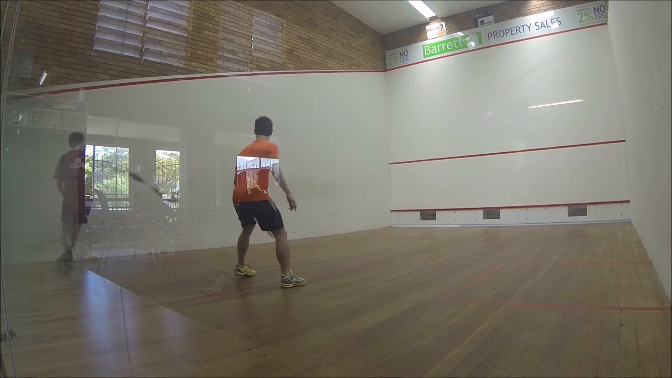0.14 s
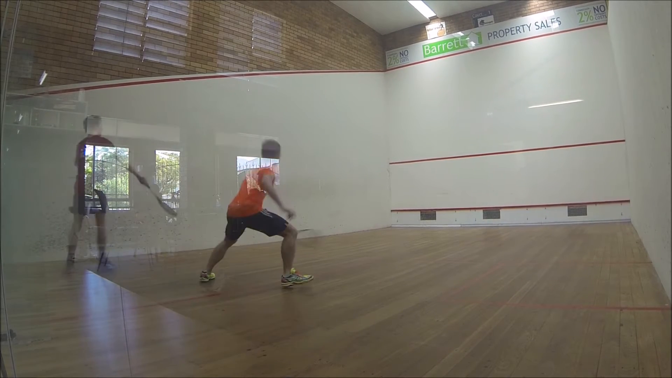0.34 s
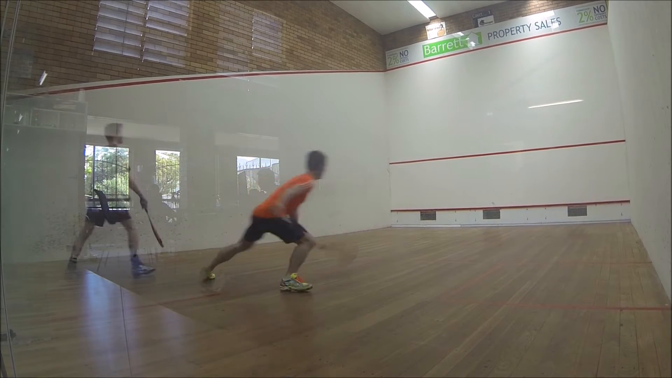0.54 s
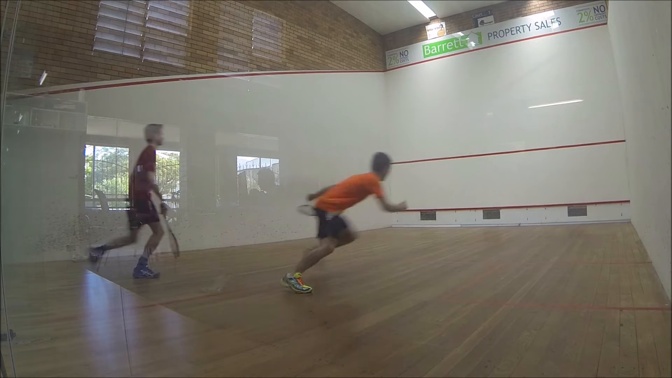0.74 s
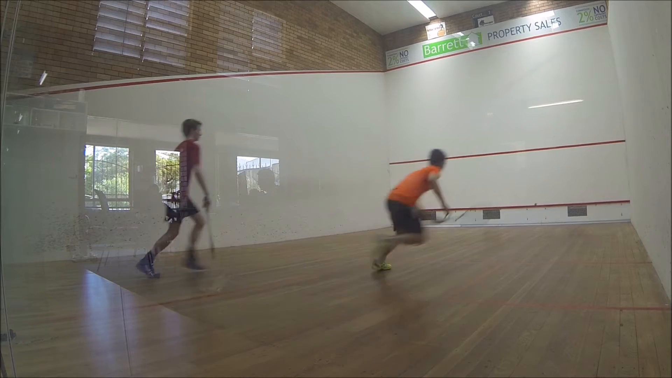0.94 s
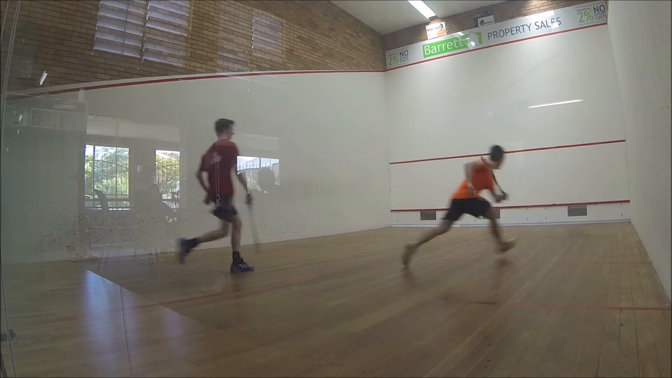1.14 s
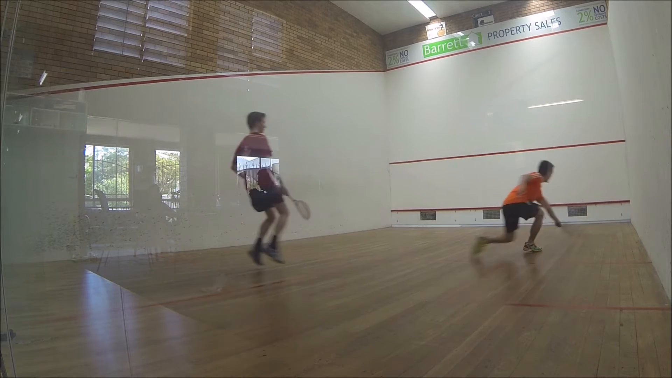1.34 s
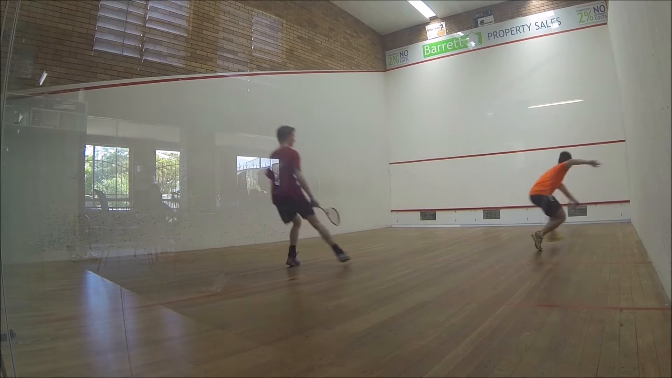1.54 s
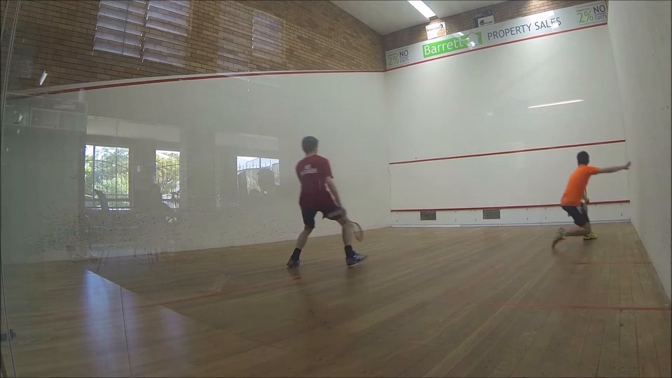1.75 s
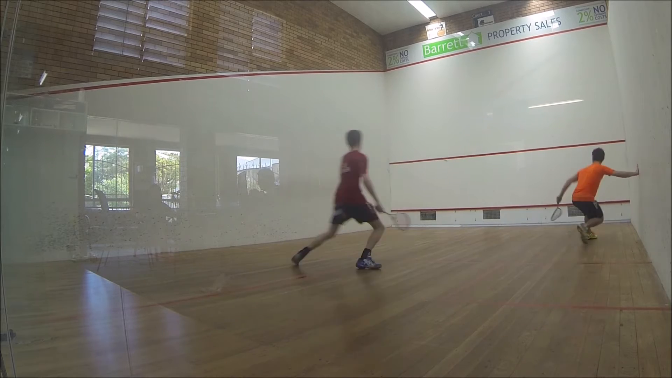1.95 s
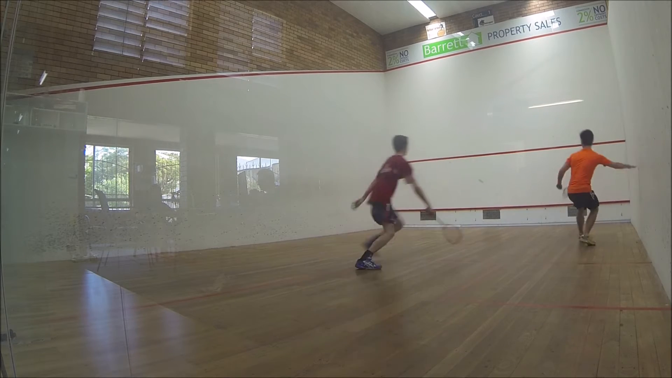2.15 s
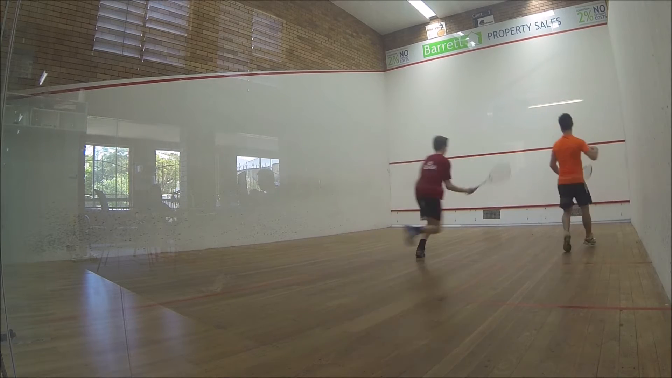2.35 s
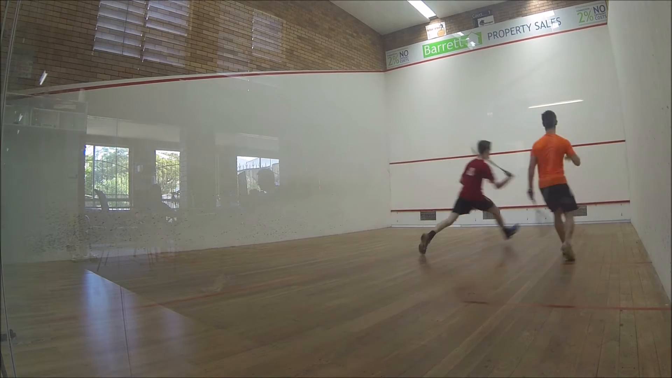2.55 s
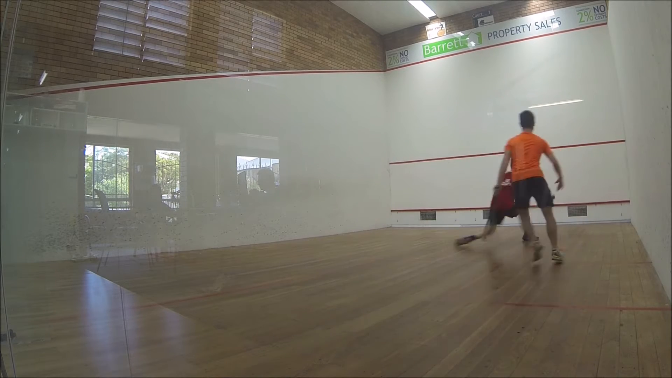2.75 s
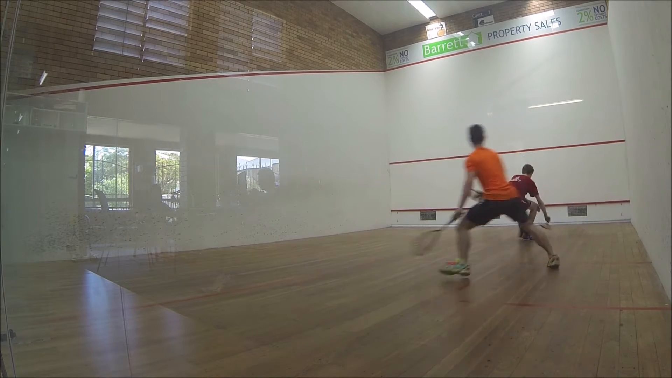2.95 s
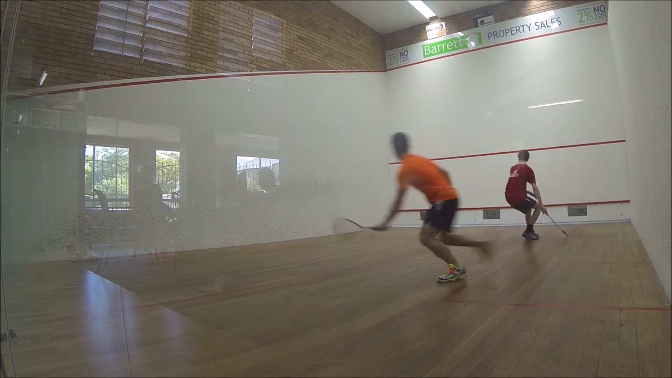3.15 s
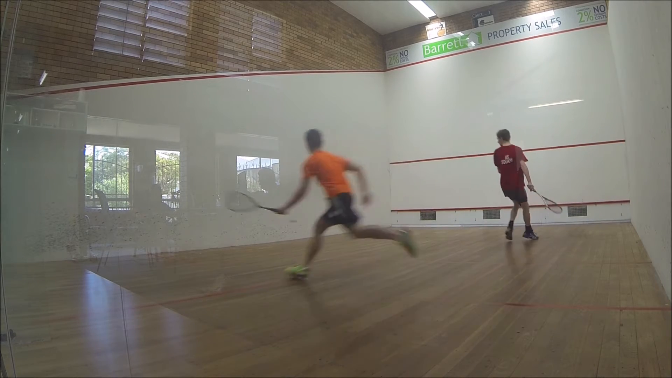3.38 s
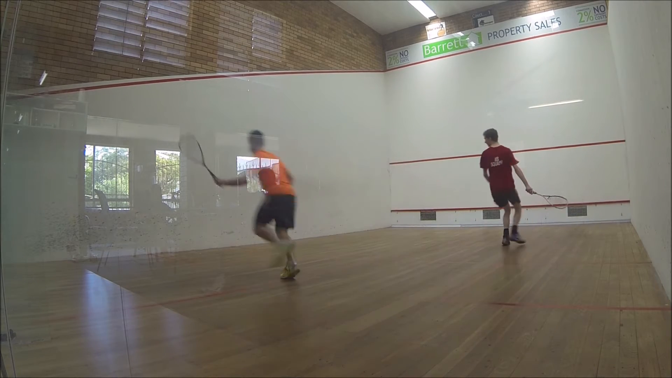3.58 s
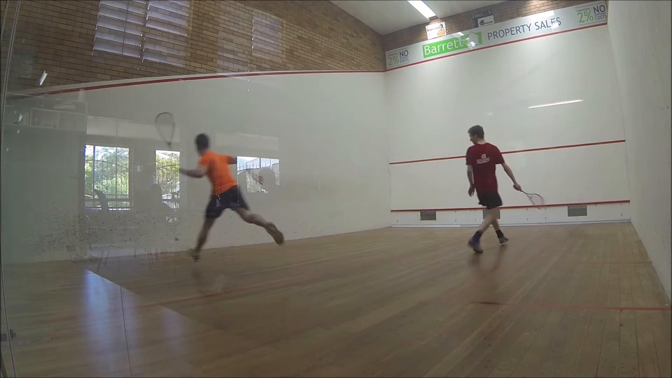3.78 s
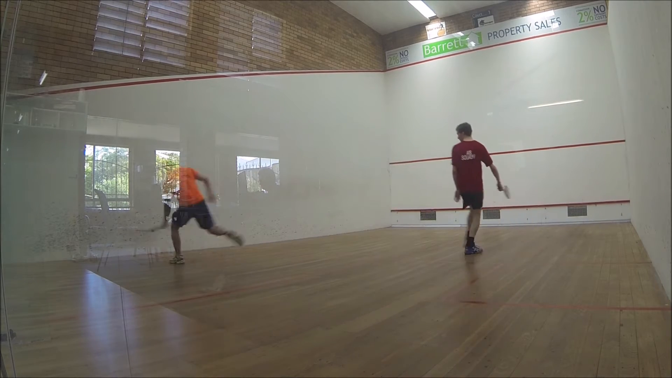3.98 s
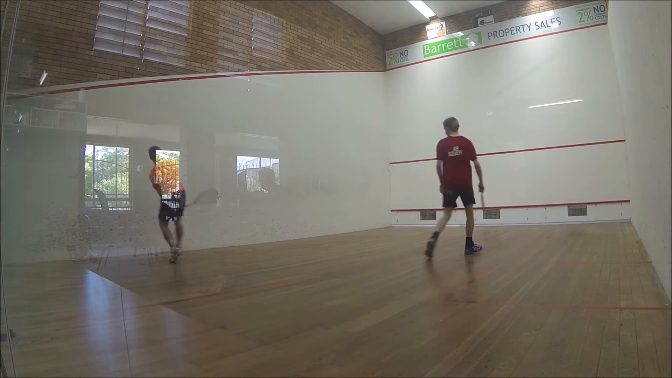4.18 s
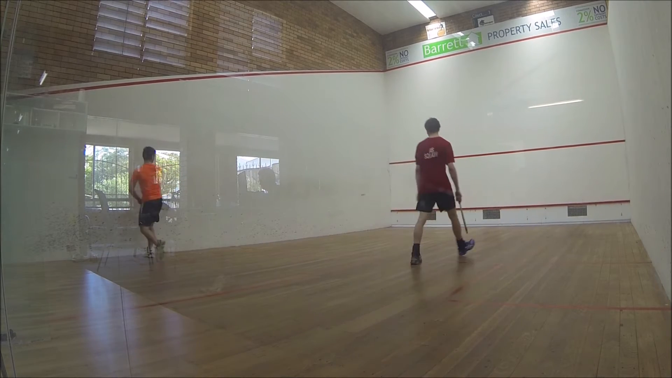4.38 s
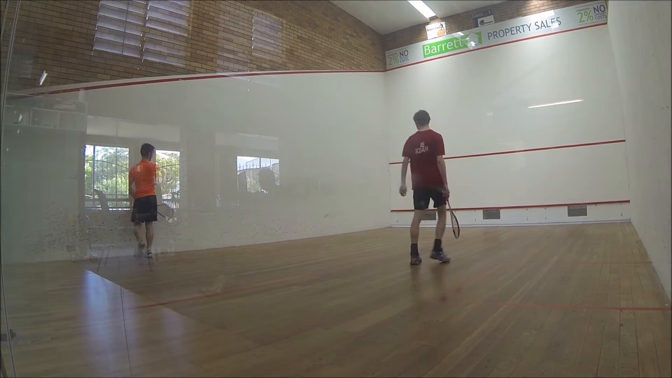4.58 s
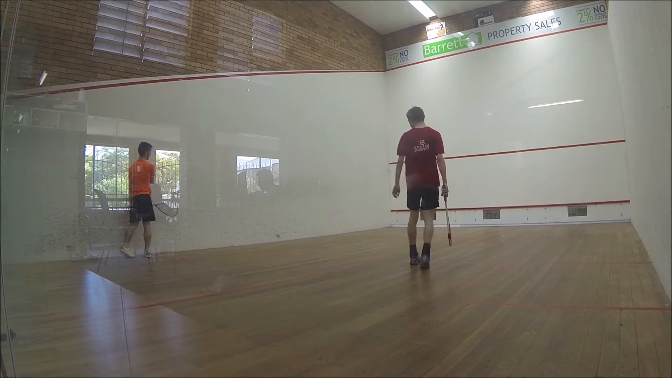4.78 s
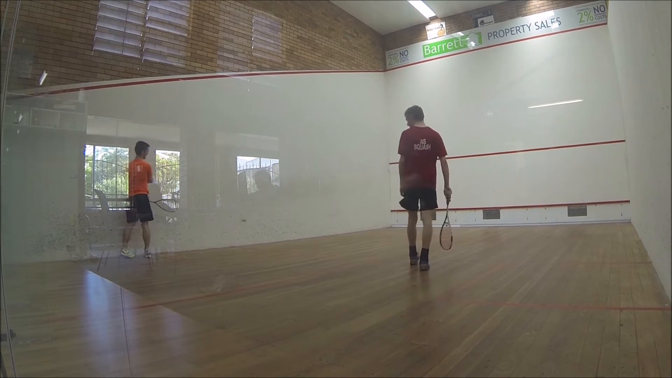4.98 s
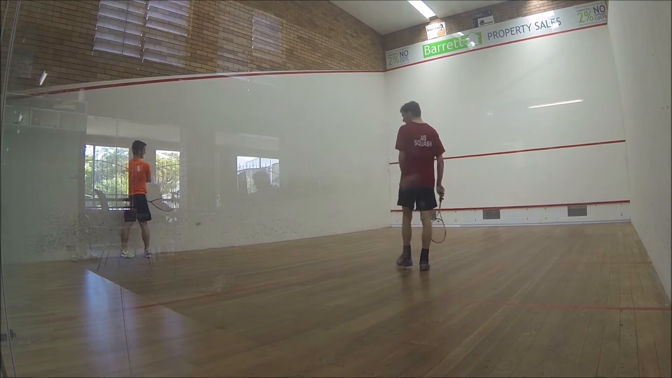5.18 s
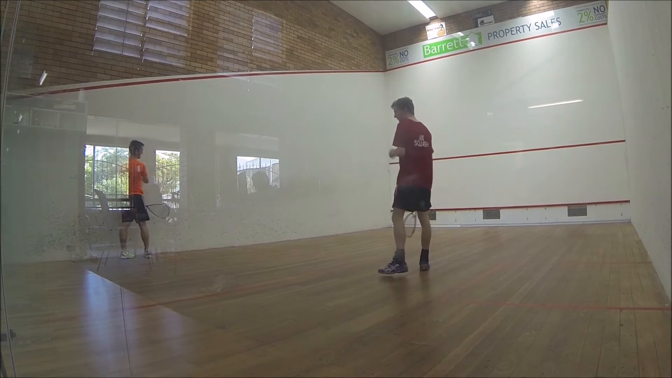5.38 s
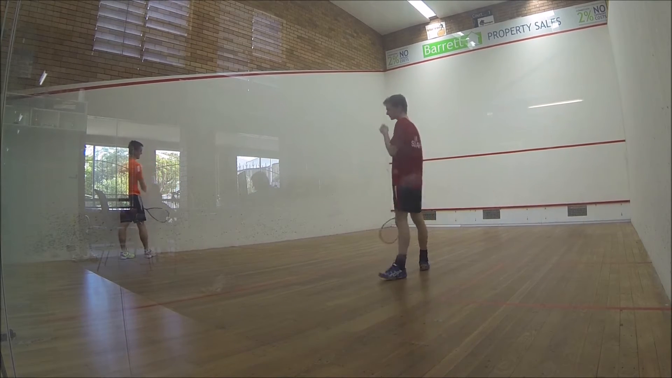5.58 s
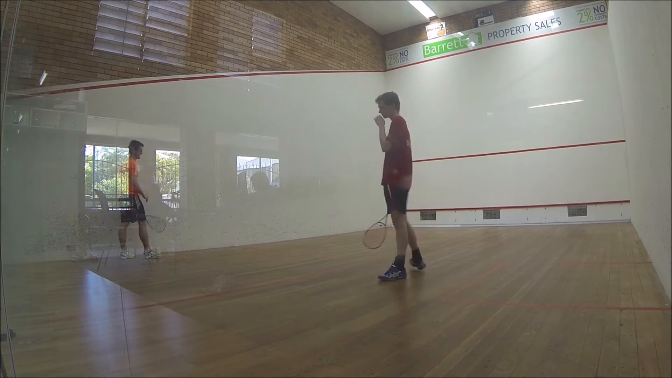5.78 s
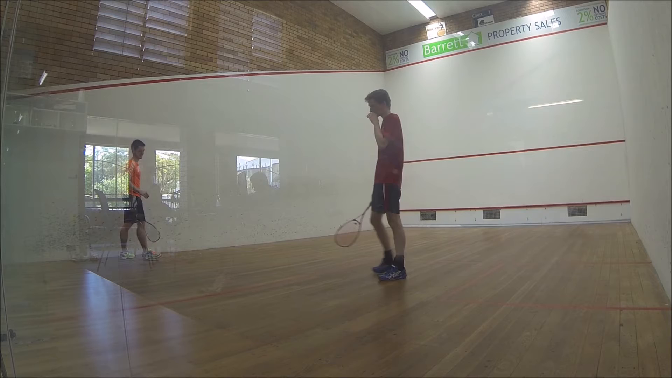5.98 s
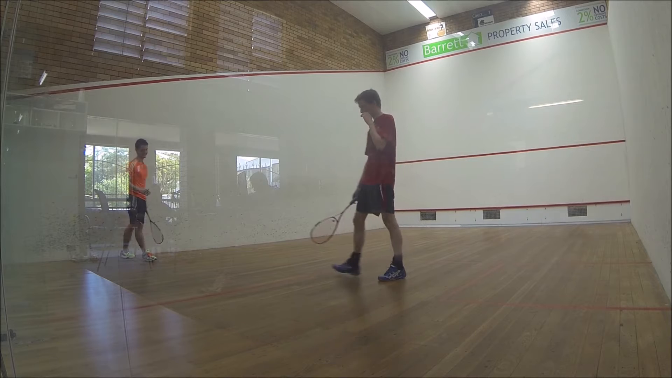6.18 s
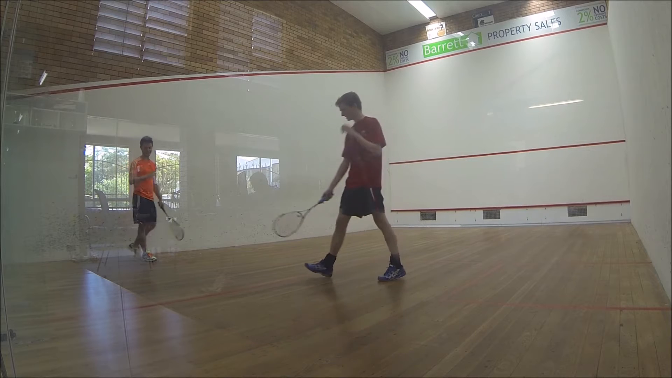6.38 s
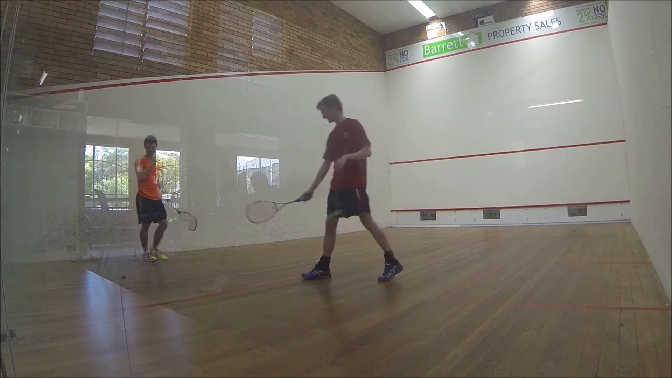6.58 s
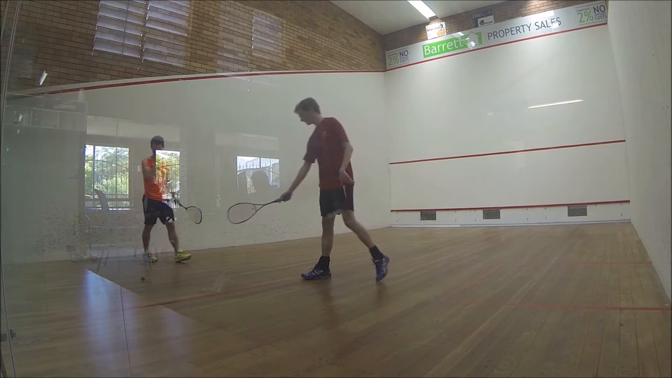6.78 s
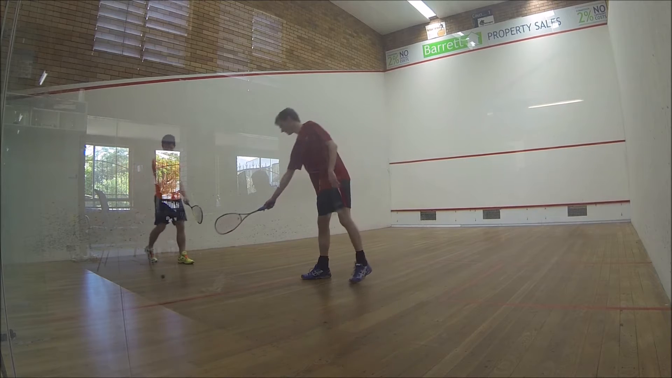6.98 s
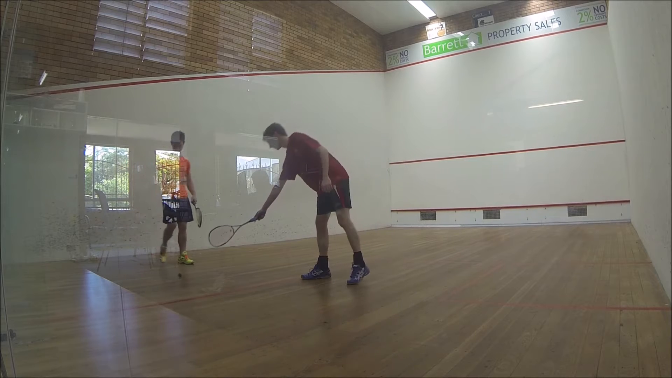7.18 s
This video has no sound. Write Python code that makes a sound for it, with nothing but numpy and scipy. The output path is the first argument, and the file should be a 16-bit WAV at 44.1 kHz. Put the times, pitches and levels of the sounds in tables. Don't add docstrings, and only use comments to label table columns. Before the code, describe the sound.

Two squash players run and strike a hollow ball in a reverberant court, shoes squeaking and floor thumping, until play stops and echoes fade.

```python
import sys
import numpy as np
from scipy import signal
from scipy.fft import rfft, irfft
from scipy.io import wavfile
from scipy.ndimage import uniform_filter1d

SR = 44100
rng = np.random.default_rng(int(sys.argv[2]) if len(sys.argv) > 2 else 0)


def boost(x):
    u = np.asarray(x, float) / 20
    return 10 ** u


def digitize_waveform(pressure):
    field = np.atleast_2d(pressure).T
    bounded = np.clip(field, -1, 1)
    quanta = np.round(bounded * 32767).astype(np.int16)
    wavfile.write(sys.argv[1], SR, quanta)


N = 318831
LEAD = 4410
PLACES = 3

# start_s [s], level_db [dB], body_hz
# [Hz], hardness_db [dB]
SMACKS = [
    (.148, -9, 874, -6),
    (.222, -16.5, 420, 2.5),
    (1.631, -22, 1500, 15.5),
    (2.993, -2.5, 746, -3),
    (4.392, -12.5, 1270, 6.5),
    (5.913, -40, 810, 2),
]
# start_s [s], level_db [dB], body_hz [Hz], hardness_db [dB]
STROKES = [
    (.737, -3.5, 815, 6.5),
    (4.067, -17, 1080, 9),
]
# start_s [s], level_db [dB], body_hz [Hz], hardness_db [dB]
FAR_BLOWS = [
    (.700, -6, 948, 5),
    (1.915, -12.5, 1720, -1.5),
    (3.022, -6.5, 750, 1),
    (3.190, -10.5, 790, 5),
    (4.040, -7, 990, -13),
    (4.461, -14.5, 666, 0),
]
# start_s [s], level_db
# [dB], body_hz [Hz], hardness_db [dB]
SLAPS = [
    (.133, -10.5, 430, -10),
    (1.170, -27, 500, -4),
    (1.317, -12.5, 860, -4.5),
    (1.532, -12, 810, -1.5),
    (1.798, -6, 935, 0.5),
    (4.160, -12.5, 750, 2),
    (2.842, -14.5, 500, -11),
    (4.188, -10.5, 486, -14),
    (4.370, -1, 663, -6.5),
]
# start_s [s], level_db [dB], body_hz [Hz], hardness_db [dB]
SCUFFS = [
    (-.03, -28, 830, 20.5),
    (.636, -13, 800, 4.5),
    (1.556, -23, 850, 5),
    (2.730, -28, 817, 10.5),
    (2.860, -7, 775, 3.5),
    (2.885, -10.5, 1790, 5.5),
    (3.350, -13, 805, -3.5),
    (6.945, -39, 800, -2),
]
# start_s [s], level_db [dB], body_hz [Hz], hardness_db [dB]
TAPS = [
    (5.563, -37.5, 1160, 4.5),
    (5.934, -34.5, 890, 3.5),
    (6.650, -32.5, 635, -4),
    (6.820, -36.5, 593, -1),
]
# events, crack_db above hardness [dB], direct_db of first arrival [dB], body_db of note [dB]
CONTACTS = [(SMACKS, 5.5, 7.6, 5.6), (STROKES, -8.5, 6.9, 7), (FAR_BLOWS, -19, -2, 6.5),
            (SLAPS, 2.2, 4, 5.7), (SCUFFS, 3.5, -3.5, 4.3), (TAPS, -2, 10.1, 11.3)]
# start_s [s], level_db [dB], pitch_hz [Hz], length_s [s], glide_hz [Hz]
SQUEAKS = [(-.095, -20.5, 3070, 0.063, 16), (-.08, -11.5, 3640, 0.078, 83), (.040, -23, 2070, 0.106, 84),
           (.430, -29.5, 2240, 0.033, 19), (.580, -21.5, 2890, 0.0345, -200),
           (.590, -27.5, 2212, 0.066, 57), (.596, -29, 5100, .05, 150), (1.630, -16, 2728, 0.0308, 214),
           (1.630, -12, 5420, 0.018, 250), (1.637, -22, 4050, 0.011, 51), (1.632, -31, 2300, 0.012, 90),
           (2.856, -17.5, 3194, 0.11, 25), (2.905, -26, 3160, 0.078, -28)]
# start_s [s], peak_db [dB], sway_hz [Hz], t60_s [s]
LANDINGS = [(1.022, -16.5, 38.7, 0.84), (1.107, -16, 61, 0.42), (1.412, -10, 54.6, 0.43),
            (1.879, -24, 28.8, 0.53), (1.93, -6.5, 34.9, 0.38), (2.83, -3, 25.8, 0.16),
            (2.875, -4, 29.9, 0.39), (3.178, -27, 35.4, 0.35), (3.634, -13, 41.7, 0.64),
            (3.783, -9.5, 37.3, 0.34), (4.046, -13, 43.5, 0.57), (4.252, -12.5, 31, 0.44),
            (4.475, -12, 41.3, 0.24), (4.656, -13, 40.4, 0.18), (5.246, -11, 29.2, 0.13),
            (5.729, -12.5, 35.3, 0.32), (5.86, -26, 36, 0.58), (6.303, -20, 33.1, 0.46),
            (6.439, -20, 26.8, 0.26)]
# full_weight_s [s], shudder_db [dB], knock_db [dB]
TREADS = [(.08, -29.5, -44), (.2, -30, -22.5), (0.361, -29, -45), (.56, -25.5, -25), (0.801, -27, -22),
          (1.04, -15.5, -19.5), (1.2, -16.5, -18), (1.469, -9, -18), (1.65, -20, -21), (1.95, -7.5, -16),
          (2.19, -18, -21.5), (2.58, -24, -30), (2.919, -9, -16.5), (3.08, -33, -42), (3.26, -16.5, -15),
          (3.62, -21, -20), (3.72, -37, -23.5), (3.9, -29, -38), (4.081, -11.5, -18.5), (4.17, -13, -12.5),
          (4.36, -31, -15), (4.49, -13, -21.5), (4.7, -19.5, -28), (5.27, -42, -37), (5.7, -32, -35),
          (5.94, -21.5, -29.5), (6.34, -24.5, -38), (6.61, -30.5, -35.5), (6.95, -34, -44)]
# centre_hz [Hz], width_hz [Hz], level_db [dB]
FLOOR_MODES = [(31.6, 15, 6.5), (40.8, 18, -1), (65.2, 20, -6), (84, 110, -33)]
# freq_hz [Hz], t60_s [s]
COURT_RING = [(100, 0.61), (300, 2.83), (800, 2.12), (2000, 2.41), (4000, 2.13), (8000, 1.4), (14000, 1.4)]
# freq_hz [Hz], density_db [dB per Hz]
PLAY_TONE = [(60, -24), (120, -31), (250, -2), (500, -0.5), (1200, -6.5), (2400, -13), (4500, -26),
             (7000, -44.5), (10000, -46), (13000, -55.5), (15500, -58)]
# freq_hz [Hz], density_db [dB per Hz]
HUM_TONE = [(20, -2.5), (54, -3.5), (200, -18.5), (500, -20), (1300, -28), (2500, -33), (4500, -46),
            (7000, -59.5), (10000, -58.5), (13000, -61), (15500, -71)]
# freq_hz [Hz], level_db [dB rms]
WHINE = [(7671, -78), (7720, -81)]
# centre_hz [Hz], width_hz [Hz], boost_db [dB]
HOUSING = [(254, 120, 7), (750, 115, 3), (1880, 460, 8), (3140, 390, 4.5), (5300, 480, 7), (6600, 670, 5),
           (8620, 780, 11), (11000, 510, 3.5)]
# centre_s [s], above_hz [Hz]
DROPOUTS = [(4.215, 4540), (4.45, 5700), (4.984, 4280), (5.028, 4250), (5.19, 4040), (5.47, 4000),
            (6.12, 4050), (6.22, 3570), (6.75, 4060), (6.86, 4060)]


def blows(rise_share=0.52, spread_s=0.011, body_share=0.22):
    upper_ratio, upper_share = 2.35, 0.26
    direct, sent = np.zeros(N + LEAD), np.zeros((PLACES, N + LEAD))
    hz, t = np.fft.rfftfreq(2048, 1 / SR), np.arange(4096) / SR
    corner_db = -3.5 / (1 + (hz / 1500) ** 2)
    corner = causal(corner_db)[:256]
    events = sorted((*event, *traits) for kind, *traits in CONTACTS for event in kind)
    for k, (s, db, body_hz, hard_db, crack_db, direct_db, body_db) in enumerate(events):
        spread = spread_s * boost(-.6 * direct_db)
        rise = 1 - np.exp(-t / (rise_share * spread))
        cluster = rng.standard_normal(len(t)) * rise * np.exp(-t / spread)
        lines = rfft(cluster)
        smooth_power = uniform_filter1d(np.abs(lines) ** 2, size=9)
        even = irfft(lines / np.sqrt(smooth_power))

        tilt_db = at_hz([(900, 0.015), (2500, hard_db), (10000, hard_db + crack_db)], hz)
        thin_db = -7.0 / (1 + (hz / (0.68 * body_hz)) ** 6)
        upper_hz = upper_ratio * body_hz
        first_note = bump(hz, body_hz, body_share * body_hz, body_db)
        second_note = bump(hz, upper_hz, body_share * upper_hz, upper_share * body_db)
        body = causal(tilt_db + thin_db + first_note + second_note)
        smack = signal.fftconvolve(body, even * rise)
        add(sent[k % PLACES], boost(db + 46) * smack, s)
        add(direct, boost(db + direct_db + 26.5) * signal.fftconvolve(smack, corner), s)
    return direct, sent


def squeaks(chatter_db=5.5, wobble=0.015, direct_db=3.0):
    direct, sent = np.zeros(N + LEAD), np.zeros((PLACES, N + LEAD))
    for k, (s, db, hz, length_s, glide_hz) in enumerate(SQUEAKS):
        order_db = -11 + 57 * length_s
        grip = rms_one(band(rng.standard_normal((2, 8192)), 14.6, 133))
        u = np.arange(min(round(length_s * SR), 8192)) / (length_s * SR)
        pitch_hz = (hz + glide_hz * u) * (1 + wobble * grip[0, :len(u)])
        phase = 2 * np.pi * np.cumsum(pitch_hz) / SR
        orders = [n for n in range(1, 6) if n * hz < 16000]
        tone = sum(boost(order_db * (n - 2)) * np.sin(n * phase) for n in orders)
        swell = np.sin(np.pi * u ** 1.04) ** 0.96
        pressure = rms_one(swell * boost(chatter_db * grip[1, :len(u)]))
        squeak = boost(db - 2) * pressure * tone
        add(sent[k % PLACES], boost(46.0) * squeak / np.sqrt(length_s * SR), s)
        add(direct, boost(direct_db) * squeak, s)
    return direct, sent


def court_echo(first_per_s=2500, thicken_s=.02, fill_s=0.0062):
    t = np.arange(round(2.6 * SR)) / SR
    share = np.minimum(first_per_s * (1 + (t / thicken_s) ** 2) / SR, 1)
    struck = rng.random(len(t)) < share
    echoes = rng.standard_normal(len(t)) * struck / np.sqrt(share)
    hz, s, cells = signal.stft(echoes, SR, nperseg=256)
    decay = boost(-60 * s / at_hz(COURT_RING, hz)[:, None])
    dying = signal.istft(cells * decay, SR, nperseg=256)[1][:len(t)]
    return dying * (1 - np.exp(-t / fill_s)) / np.sqrt(SR)


def landings(share_db=2.0):
    give_s = 0.023
    out, t = np.zeros(N + LEAD), np.arange(SR) / SR
    for (s, db, hz, t60), (turn, upper_turn) in zip(LANDINGS, rng.random((len(LANDINGS), 2))):
        shape = (1 - np.exp(-(t / give_s) ** 2)) * boost(-60 * t / t60)
        sway = np.sin(2 * np.pi * (hz * t + turn))
        upper_sway = 0.25 * np.sin(2 * np.pi * (1.4 * hz * t + upper_turn))
        add(out, boost(db + share_db) * shape * (sway + upper_sway), s)
    return out[LEAD:]


def shudder(even=0.57, low_db=-5.5, knock_db=-9.0, top_hz=140):
    s, tread_shudder_db, tread_knock_db = np.transpose(TREADS)
    push = rng.standard_normal((2, N + SR))
    low = sum(boost(db) * rms_one(band(push[0], hz - w / 2, hz + w / 2, order=1)) for hz, w, db in FLOOR_MODES)
    low = band(low, 12.2, top_hz, order=3)
    low = low / np.sqrt(uniform_filter1d(low ** 2, 3000) + 1e-3) ** even
    knock = band(push[1], 75, 327.4, order=4)
    low_weight = treading(s, tread_shudder_db, load_db_per_s=112, settle_db_per_s=69.5)
    knock_weight = treading(s, tread_knock_db, load_db_per_s=103, settle_db_per_s=46.5)
    return (boost(low_db) * low_weight * rms_one(low[SR:])
            + boost(knock_db) * knock_weight * rms_one(knock[SR:]))


def treading(s, db, load_db_per_s, settle_db_per_s):
    after = np.arange(0, N + 64, 64)[:, None] / SR - s
    level_db = db - np.maximum(-load_db_per_s * after, settle_db_per_s * after)
    weight = np.sqrt(np.sum(boost(2 * level_db), axis=1))
    return np.interp(np.arange(N) / 64, np.arange(len(after)), weight)


def hall_hum():
    noise = rng.standard_normal(N + LEAD)
    return boost(-39.5) * rms_one(housed(noise, HUM_TONE)[LEAD:])


def camera_electronics():
    t = np.arange(N) / SR
    whine = sum(np.sqrt(2) * boost(db + 1) * np.sin(2 * np.pi * hz * t) for hz, db in WHINE)
    since_tick = (t - .0046) % (1 / 48.0)
    tick = boost(-73.5 - 60 * since_tick / 0.046) * np.sin(2 * np.pi * 11300 * t)
    return whine + tick


def housed(x, spectrum):
    hz = np.fft.rfftfreq(8192, 1 / SR)
    level_db = at_hz(spectrum, hz) + sum(bump(hz, *peak) for peak in HOUSING)
    return signal.oaconvolve(x, causal(level_db))[:len(x)]


def at_hz(points, hz):
    point_hz, values = np.transpose(points)
    return np.interp(np.log(hz + 1), np.log(point_hz), values)


def bump(hz, centre_hz, width_hz, boost_db):
    return boost_db * np.exp(-2 * ((hz - centre_hz) / width_hz) ** 2)


def causal(level_db):
    cepstrum = irfft(np.log(boost(level_db)))
    cepstrum[1:len(level_db) - 1] *= 2
    cepstrum[len(level_db):] = 0
    return irfft(np.exp(rfft(cepstrum)))


def rms_one(x):
    return x / np.sqrt(np.mean(x ** 2) + 1e-20)


def band(x, low_hz, high_hz, order=2):
    return signal.sosfilt(signal.butter(order, [low_hz, high_hz], "band", fs=SR, output="sos"), x)


def add(track, sound, s):
    i = round(s * SR) + LEAD
    track[i:i + len(sound)] += sound[:len(track) - i]


def scene():
    ball, ball_sent = blows()
    sole, sole_sent = squeaks()
    ringing = sum(signal.fftconvolve(x, court_echo())[:N + LEAD] for x in ball_sent + sole_sent)
    play = housed(ball + sole + ringing, PLAY_TONE)[LEAD:]
    floor = landings() + shudder()
    background = hall_hum() + camera_electronics()
    return (play + floor + background)[None]


def roll_off(x):
    return signal.sosfilt(signal.butter(12, 15150, fs=SR, output="sos"), x)


def record(dry):
    x, t = 1.432 * np.tanh(dry / 1.19), np.arange(N) / SR
    for s, hz in DROPOUTS:
        i = slice(round(s * SR) - 2048, round(s * SR) + 2048)
        treble = signal.sosfiltfilt(signal.butter(6, hz, "high", fs=SR, output="sos"), x[:, i])
        loss = np.clip(2.5 - np.abs(t[i] - s) / .0025, 0, .97)
        x[:, i] = x[:, i] - treble * loss
    return roll_off(x)


dry = scene()
out = record(dry)
digitize_waveform(out)
```